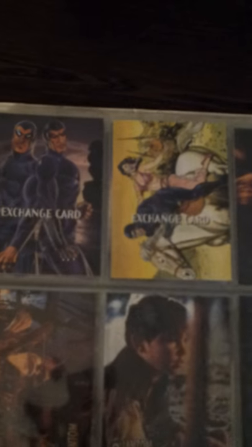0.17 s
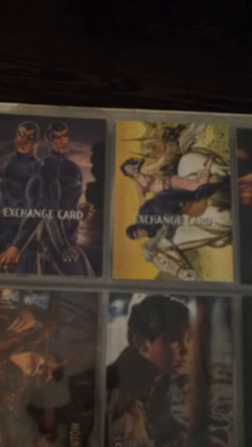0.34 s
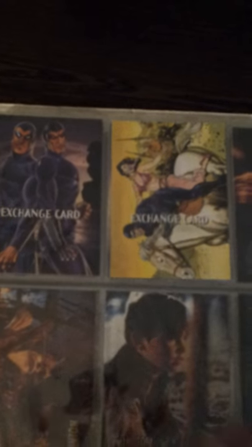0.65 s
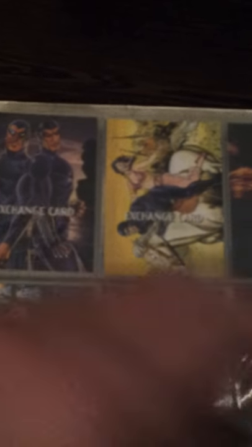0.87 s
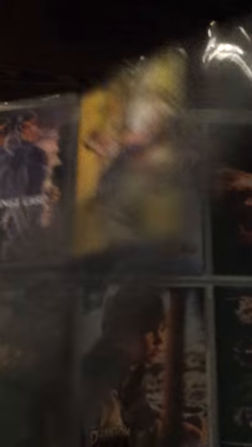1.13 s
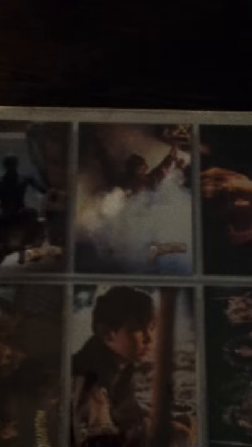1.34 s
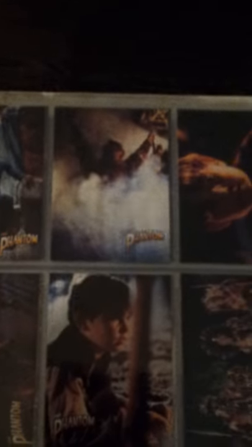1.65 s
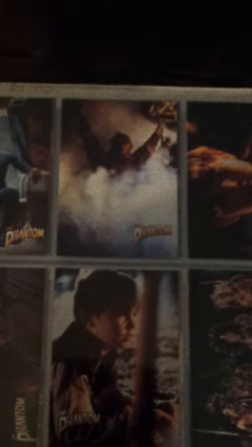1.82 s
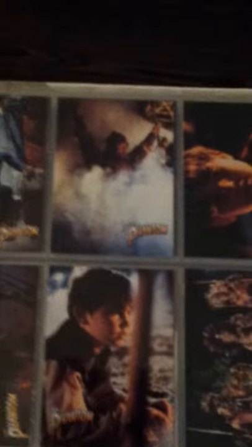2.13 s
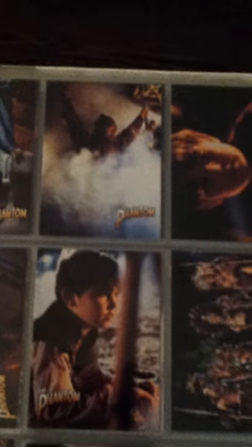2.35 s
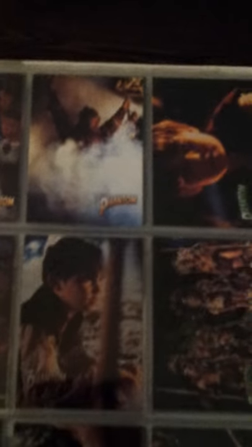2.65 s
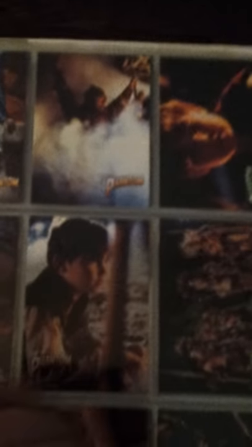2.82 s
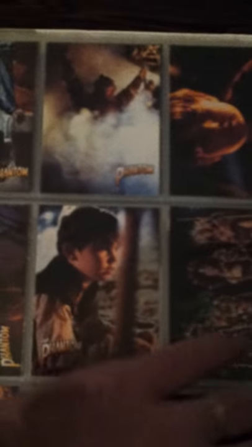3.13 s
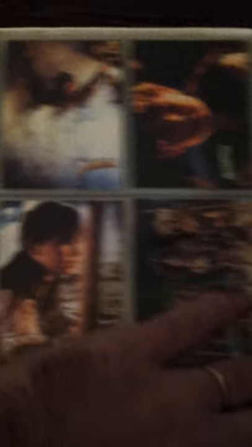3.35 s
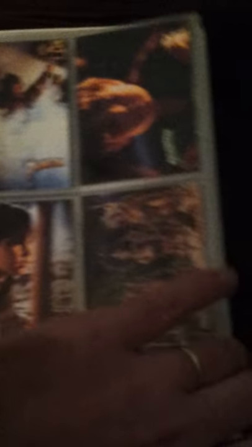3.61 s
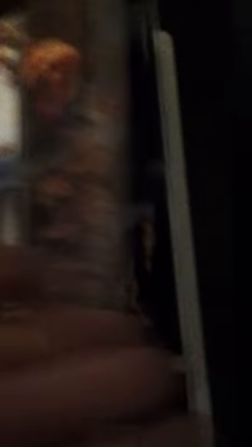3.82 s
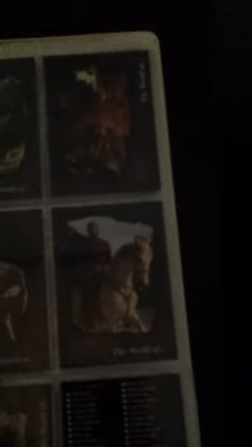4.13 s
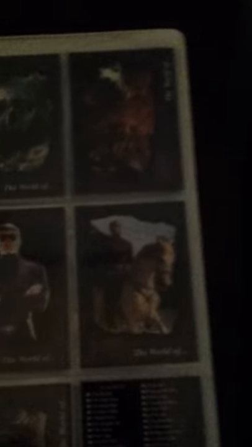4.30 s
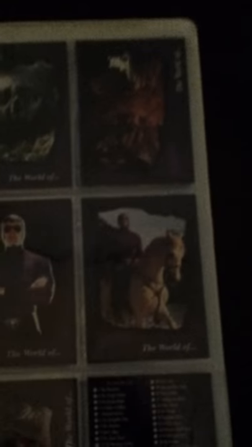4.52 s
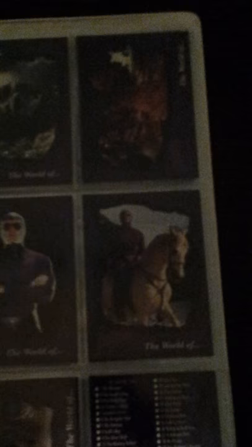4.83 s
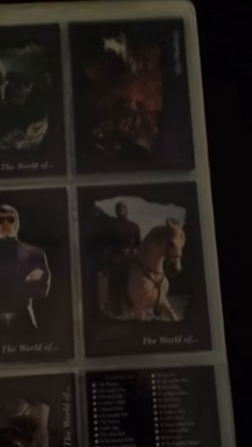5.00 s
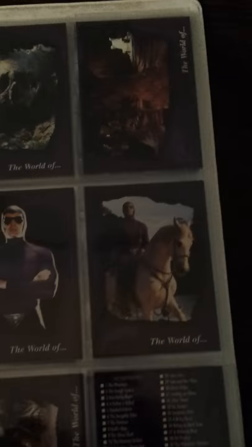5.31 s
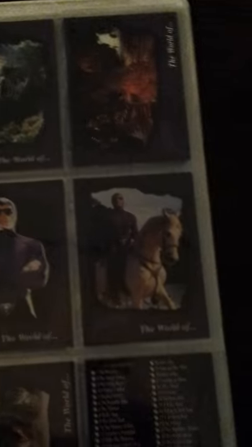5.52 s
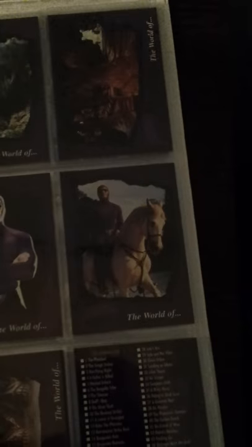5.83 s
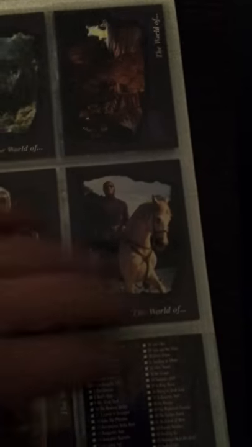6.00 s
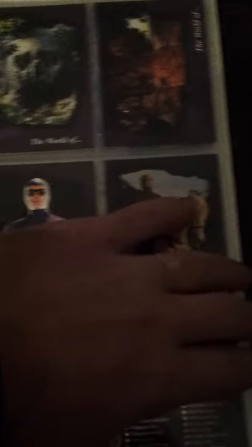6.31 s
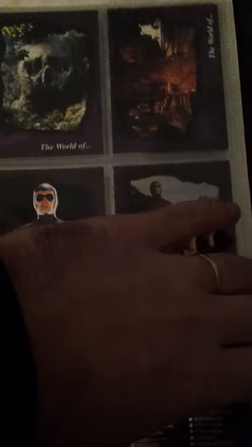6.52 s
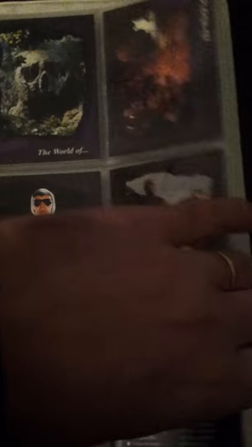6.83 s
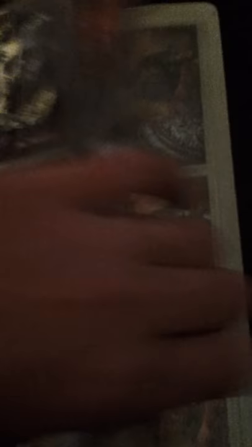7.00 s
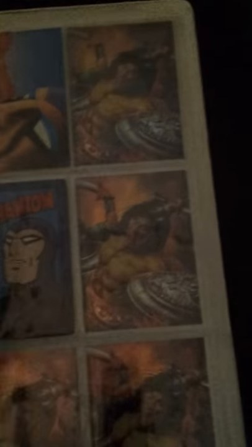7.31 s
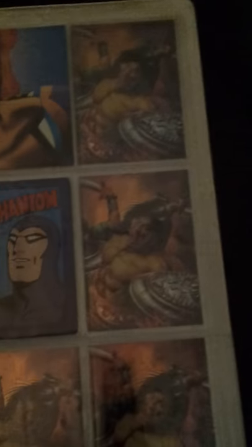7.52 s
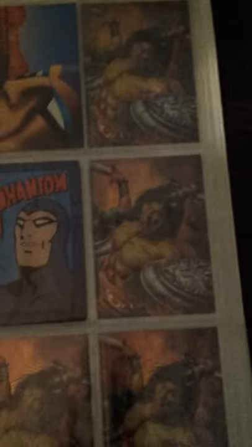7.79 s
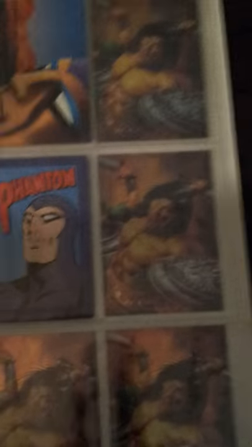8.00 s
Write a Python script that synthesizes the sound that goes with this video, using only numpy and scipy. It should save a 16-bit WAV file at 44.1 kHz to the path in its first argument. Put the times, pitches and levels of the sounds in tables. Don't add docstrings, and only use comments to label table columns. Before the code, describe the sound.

In a quiet small room, a hand turns three stiff plastic pocket pages in a binder. Each turn starts with faint grainy rubbing, grows into crisp snaps and airy pops, then lands with low dull thuds. The second turn is the densest and loudest. A small close microphone adds steady hiss, with only faint reflections.

```python
import sys
import numpy as np
from scipy import signal
from scipy.fft import rfft, irfft, next_fast_len
from scipy.io import wavfile
from scipy.ndimage import uniform_filter1d

SR = 44100
rng = np.random.default_rng(int(sys.argv[2]) if len(sys.argv) > 2 else 0)


def volts_from_decibels(level):
    exponent = np.asarray(level, float) / 20
    return 10 ** exponent


def wav_record(signal):
    frames = np.transpose(np.atleast_2d(signal))
    bounded = np.clip(frames, -1, 1)
    quanta = np.round(bounded * 32767).astype(np.int16)
    wavfile.write(sys.argv[1], SR, quanta)


N = 359415

# (t/s, peak level/dB, f/Hz, t60/s)
THUDS = [(1.1493, -42, 352, 0.081), (1.4974, -35, 92.0, 0.052), (1.5304, -33, 112, 0.25),
         (1.5527, -33.5, 75.0, 0.1), (1.7549, -25.5, 65.0, 0.033), (1.9451, -26.5, 274, 0.026),
         (2.1258, -27.5, 139, 0.045), (2.244, -40.5, 95, .1), (2.345, -30.5, 139, 0.17),
         (3.1631, -46, 147, 0.15), (3.3, -47.5, 149, .1), (3.476, -44.5, 136, 0.09),
         (4.028, -42, 81, 0.055), (4.8585, -31.5, 83.5, 0.12), (5.0007, -38.5, 159, 0.21),
         (5.185, -33, 167, 0.077), (5.2392, -32.5, 166, 0.38), (5.316, -24, 86.0, 0.037),
         (5.5445, -36, 154, 0.2), (5.67, -25.5, 90, 0.068), (5.7129, -37, 146, 0.14),
         (6.566, -45.5, 145, 0.59), (6.615, -43, 157, 0.21), (6.76, -56, 145, 0.21),
         (7.346, -39, 180, 0.045), (7.5128, -35.5, 54.0, 0.093), (7.6858, -41.5, 140, 0.14),
         (7.8928, -32.5, 92.5, 0.13), (7.9407, -34, 86.0, 0.069), (8.121, -38, 94, 0.3)]
# (t/s, peak level/dB, pocket f/Hz, length/ms)
POCKET_POPS = [(.903, -40, 536, 16), (1.1521, -31.5, 640, 5.3), (1.404, -33, 580, 0.98),
               (1.475, -34, 1700, 2.2), (1.535, -36, 900, 2.5), (1.561, -39, 1000, 2),
               (1.7605, -29, 1400, 6.8), (1.948, -26.5, 880, 9.3), (1.9702, -26.5, 1940, 5.9),
               (2.035, -29.5, 1320, 6.1), (2.1288, -30.5, 1260, 1.8), (2.2008, -25, 1730, 3.7),
               (2.2082, -22, 1830, 3.1), (2.2422, -20.5, 825, 3.1), (2.3228, -22, 1200, 6),
               (2.358, -26, 1480, 11),
               (3.312, -42, 704, 2), (3.4692, -39, 1290, 5.2), (3.7302, -39.5, 2080, 5.5),
               (3.9033, -31.5, 1340, 16), (3.853, -45, 1330, 7.4), (4.029, -39, 1540, 5.2),
               (4.199, -26, 2400, 1.6), (4.204, -25, 2100, 1.6), (4.2085, -24, 2000, 1.2),
               (4.2128, -39, 2020, 3.5), (4.2821, -30, 610, 16), (4.4582, -30, 800, 5.6),
               (4.4793, -20.5, 820, 1.5), (4.8603, -22.5, 1600, 3.6), (4.892, -33, 1300, 2.7),
               (4.926, -36.5, 1410, 5.3), (4.9916, -22.5, 676, 10.5), (5.0978, -27, 1630, 11),
               (5.1839, -14, 1360, 8.6), (5.2373, -8, 1570, 2), (5.2728, -13, 1540, 5.2),
               (5.3123, -1.5, 1350, 2.35), (5.326, -18, 1030, 1.14), (5.543, -26.5, 1210, 1.5),
               (5.572, -31, 1290, 3.8), (5.597, -32, 1400, 3.4), (5.6474, -23.5, 1840, 3.1),
               (5.6738, -22, 1320, 1.6),
               (6.318, -41, 2300, 1.9), (6.582, -39, 2520, 7.3), (6.6184, -36.5, 1500, 2.6),
              (7.298, -39, 955, 4.8), (7.5788, -30, 1550, 1.7), (7.583, -25, 1590, 4.7),
              (7.683, -24, 1780, 1.9), (7.6868, -16.5, 1720, 5), (7.7708, -21, 1530, 3),
              (7.845, -28.5, 990, 11.6), (7.889, -24.5, 1610, 14), (7.898, -22.5, 850, 5.4),
              (7.942, -27.5, 1420, 9.1), (8.1165, -22.5, 1850, 6.8)]
POPS = POCKET_POPS


def rms_one(x):
    return x / np.sqrt(np.mean(x ** 2) + 1e-20)


def drift(rate_hz):
    r = np.exp(-2 * np.pi * rate_hz / SR)
    wander = signal.lfilter([1], [1, -2 * r, r * r], rng.standard_normal(N + SR))
    return rms_one(wander[SR:])


def resonance(x, hz, width_hz):
    r = np.exp(-np.pi * width_hz / SR)
    zeros = np.array([1, 0, -1]) * (1 - r * r) / 2
    return signal.lfilter(zeros, [1, -2 * r * np.cos(2 * np.pi * hz / SR), r * r], x)


def body(x, modes, patchy_db, tilt_db=0):
    out = 0
    for k, (hz, width_hz, db) in enumerate(modes):
        lean_db = tilt_db * np.log2(hz / 6500)
        ring = resonance(resonance(x, hz, width_hz), hz, 4.62 * width_hz)
        out = out + (-1) ** k * volts_from_decibels(db + lean_db + patchy_db * drift(4.9)) * ring
    return rms_one(out)


def in_time(rows):
    s, *columns = np.transpose(rows)
    return [np.interp(np.arange(N) / SR, s, c) for c in columns]


def place(out, s, peak_db, sound):
    at = round(s * SR)
    scaled = volts_from_decibels(peak_db) * sound / np.abs(sound).max()
    return np.pad(scaled, (at, N))[:N] + out


def hiss():
    # (f/Hz, level/dB per Hz)
    colour = [(20, -21), (42, 0), (100, -11), (300, -9.5), (2600, -20), (11500, -21.5), (15000, -16),
              (22000, -120)]
    hz, db = np.transpose(colour)
    grid = np.arange(N // 2 + 1) * SR / N + 1
    shape = volts_from_decibels(np.interp(np.log(grid), np.log(hz), db))
    return volts_from_decibels(-59) * rms_one(irfft(rfft(rng.standard_normal(N)) * shape, N))


def room(x):
    t60_s, wall_cut_hz = 0.44, 1540
    size = next_fast_len(N + SR)
    turn = np.exp(-2j * np.pi * np.arange(size // 2 + 1) / size)
    dull = np.exp(-2 * np.pi * wall_cut_hz / SR)
    echo = 0
    for k, lag in enumerate((rng.uniform(.006, 0.028, 8) * SR).astype(int)):
        loop = volts_from_decibels(-60 * lag / SR / t60_s) * (1 - dull) / (1 - dull * turn) * turn ** lag
        echo = echo + (-1) ** k * loop / (1 - loop)
    return irfft(rfft(x, size) * echo, size)[:N]


def squeak():
    length_s, start_hz, tight_hz, tighten_s = .125, 6500, 8400, .065
    t = np.arange(round(length_s * SR)) / SR
    hz = tight_hz - (tight_hz - start_hz) * np.exp(-t / tighten_s)
    waver = volts_from_decibels(2.1 * drift(60)[:len(t)])
    swelling = np.sin(np.pi * t / length_s) ** .5
    whistle = np.sin(2 * np.pi * np.cumsum(hz) / SR)
    return place(0, 4.068, -50, swelling * waver * whistle)


def thuds():
    out, t = 0, np.arange(12000) / SR
    for s, peak_db, hz, t60 in THUDS:
        fade = volts_from_decibels(-60 * t / max(0.49 * t60, .02)) * (1 - np.exp(-t / 0.0026))
        overtone = .5 * np.sin(2 * np.pi * 1.65 * hz * t) * np.exp(-t / 0.0048)
        swing = -np.sin(2 * np.pi * hz * t) - overtone
        puff = rms_one(resonance(rng.standard_normal(len(t)), 358, 340))
        out = place(out, s + 0.00088, peak_db + 0.37, fade * (swing + 0.5 * puff))
    return signal.sosfilt(signal.butter(2, 46.3, "high", fs=SR, output="sos"), out)


def pops():
    out, size = 0, 2048
    ms = np.arange(size) / SR * 1000
    for s, peak_db, pocket_hz, length_ms in POPS:
        noise, settle = rng.standard_normal((2, size))
        length = np.clip(length_ms, .5, 12)
        kick = noise * ms / length * np.exp(-(ms / (.5 * length)) ** 2)
        kick += volts_from_decibels(-16.5) * settle * np.exp(-ms / 4.04)
        pocket = resonance(resonance(kick, pocket_hz, 270), pocket_hz, 1100)
        knock = resonance(resonance(kick, 790, 246.0), 2020, 990)
        breath = 0.29 * resonance(kick, 1.02 * pocket_hz, 1800)
        out = place(out, s - .0003, peak_db - .3, pocket + volts_from_decibels(-3.0) * knock + breath)
    return out


def all_snaps():
    # (t/s, peak level/dB, crack f/Hz, crumble/ms)
    first = [(0.937, -30, 7260, 0.91), (1.0874, -27, 5440, 0.14), (1.297, -43, 5980, 1.9),
             (1.4633, -21, 5560, 1.3), (1.7621, -21.5, 5260, 0.42), (1.9492, -4.5, 6900, 0.45),
             (1.949, -12.5, 6700.0, 1.8), (1.972, -17, 4730, 0.58), (2.0352, -35, 5260, 0.2),
             (2.1333, -27.5, 5600, 1.1), (2.201, -36, 6050, 0.59), (2.2078, -11, 6300, 0.72),
             (2.2439, -12, 6500, 0.17),]
    # (t/s, peak level/dB, crack f/Hz, crumble/ms)
    lift = [
        (3.164, -37.5, 6600, 0.65),
        (3.74, -29.5, 5540, 2.3),
        (3.789, -25.5, 5930, 0.34),
        (3.9088, -21.5, 3000, 0.29),
        (3.9113, -21, 4100, 0.17),
    ]
    # (t/s, peak level/dB, crack f/Hz)
    peel = [(4.0311, -37, 3100), (4.0343, -33, 6700), (4.0562, -25, 6300), (4.0616, -29, 5900),
            (4.0632, -30, 6400), (4.097, -34, 6700), (4.1257, -25.5, 5400), (4.1286, -30, 5700),
            (4.1432, -31, 6300), (4.1592, -21, 6700), (4.1622, -34, 6700), (4.178, -29, 6300),
            (4.2, -17, 6300), (4.2043, -24, 6500), (4.2085, -22, 3660), (4.2125, -16, 6100),
            (4.2198, -18, 6100), (4.2429, -29, 6800), (4.2452, -33, 6500), (4.2681, -32, 6700),
            (4.2704, -34, 6400), (4.285, -14, 5860), (4.2888, -21, 6030), (4.299, -28, 6400),
            (4.3294, -13, 6500), (4.3334, -11, 8100), (4.336, -14.5, 8950), (4.338, -23, 5800),
            (4.35, -18, 7500), (4.3522, -18, 6600), (4.361, -23, 6600), (4.3777, -12, 7060),
            (4.381, -8, 7150), (4.384, -24, 6400), (4.3962, -20, 6300), (4.4004, -26, 5700),
            (4.4137, -27, 6500), (4.4212, -24, 7300), (4.4358, -29, 6500), (4.439, -17, 6100),
            (4.4468, -17, 6360), (4.451, -19, 6800), (4.46, -21, 6700), (4.4652, -15, 6040),
            (4.479, -25, 6800), (4.479, -13, 6200), (4.49, -13, 6360), (4.4939, -10, 6360),
            (4.4987, -21, 6600), (4.5168, -26, 6430), (4.5195, -16, 7100), (4.522, -13, 7060),
            (4.527, -22, 6000), (4.529, -20, 5000), (4.532, -19, 8060), (4.542, -26, 6500),
            (4.5801, -26, 6350), (4.5837, -52, 6700)]
    # (t/s, peak level/dB, crack f/Hz, crumble/ms)
    flip = [(4.9943, -24, 6030, 0.67), (5.099, -20.5, 5330, 0.14), (5.1828, -11, 8100, 2.8),
            (5.1862, -14, 5700, 5.6), (5.2364, -1.5, 6140, 0.81), (5.238, -4.5, 7160, 1),
            (5.273, -13, 7300, 1.8), (5.277, -15, 5060, 1.5), (5.311, -0.5, 5900, 0.76),
            (5.313, -7.5, 4800, 0.64), (5.314, -1.5, 4500, 0.38), (5.451, -25.5, 6060, 0.17),
            (5.648, -18, 6500, 0.62), (5.6517, -13.5, 6300, 0.27), (5.674, -21, 9500, 0.89)]
    # (t/s, peak level/dB, crack f/Hz, crumble/ms)
    third = [(6.3194, -34, 4120, 0.48), (6.6368, -28, 7100, 0.08), (6.819, -24, 6640, 0.92),
             (7.002, -30, 6300, 0.71), (7.0636, -16.5, 4330, 2.3), (7.0924, -18.5, 6570, 1.1),
             (7.2148, -26, 6700, 1.6), (7.3012, -26.5, 8350.0, 0.36), (7.3282, -17.5, 5130, 0.3),
             (7.3322, -19, 6900, 0.17), (7.6826, -18, 6350, 0.65), (7.6867, -13, 6000, 0.5),
             (7.7703, -15, 6200, 0.99), (7.8876, -14, 6500, 0.19), (7.898, -18.5, 5900, 0.78),
             (7.9225, -21.5, 6140, 0.32), (8.12, -25, 3280, 0.88)]
    # (t/s, peak level/dB, crack f/Hz)
    further_cracks = [(0.6498, -47, 5900), (1.2914, -46, 6700), (1.2992, -35, 3870), (1.7273, -26, 5800),
                      (1.9472, -28, 5300), (1.9523, -28, 6200), (1.975, -38, 4800), (2.2108, -44, 4300),
                      (2.2237, -31, 5200), (2.3232, -38, 4100), (2.36, -43, 4300), (2.3646, -28, 3500),
                      (2.365, -27, 3000), (2.395, -34, 5040), (2.4482, -38, 5800), (3.1567, -43, 6200),
                      (3.2896, -39, 5400), (3.3141, -46, 5600), (3.6076, -41, 5300), (3.619, -43, 7600),
                      (3.7116, -44, 6900), (3.7918, -47, 5200), (4.8931, -26, 5200), (4.9968, -29.5, 3420),
                      (5.0053, -37, 6700), (5.105, -19, 7100), (5.24, -8, 4900), (5.3425, -19, 6900),
                      (5.3891, -27, 5370), (5.413, -26.5, 7100), (5.4298, -33, 8000), (5.4672, -31, 6000),
                      (5.741, -39, 6000), (6.2763, -50, 6400), (6.3673, -47, 5900), (6.5608, -43, 5600),
                      (6.5741, -40, 6600), (6.6044, -29, 7050), (6.6177, -41, 6400), (6.8207, -42, 6600),
                      (6.879, -42, 7400), (6.9357, -45, 6700), (7.0104, -31, 3860), (7.044, -49, 6900),
                      (7.0663, -32, 4700), (7.0756, -28, 8640), (7.0792, -41, 7800), (7.2117, -30, 7400),
                      (7.5842, -52, 3400), (7.5938, -44.5, 6300), (7.6266, -43, 5300), (7.6904, -28, 3600),
                      (7.7732, -29, 6900), (7.7938, -27.5, 4100), (7.8181, -25.5, 7200), (7.8502, -32, 6200),
                      (7.8692, -31, 6700), (8.1252, -24.5, 6200)]
    peel_crumble_ms, tick_crumble_ms = 0.44, 0.72
    peel = [tuple(row) + (peel_crumble_ms,) for row in peel]
    further_cracks = [tuple(row) + (tick_crumble_ms,) for row in further_cracks]
    return first + lift + peel + flip + third + further_cracks


def snaps():
    out, size = 0, 2048
    ms = np.arange(size) / SR * 1000
    for s, peak_db, crack_hz, crumble_ms in all_snaps():
        noise, settle = rng.standard_normal((2, size))
        length = np.clip(crumble_ms, .08, 6)
        cracks = 0.77 * np.minimum(length, 1.6) * noise * np.exp(-(ms / (0.65 * length)) ** 2)
        cracks += volts_from_decibels(-22.0) * settle * np.exp(-ms / 3.0)
        cracks[0] = 0.85
        crack = resonance(resonance(cracks, crack_hz, 1290), crack_hz, 4400)
        sleeve = 0.095 * resonance(cracks, 4600, 450)
        sleeve += volts_from_decibels(-8 + 0.21 * peak_db) * resonance(cracks, 3400, 8000)
        sleeve += volts_from_decibels(-12.5 + .3 * peak_db) * resonance(cracks, 12100, 1700)
        out = place(out, s - .0002, peak_db - .3, crack + sleeve)
    return out


def swell(peak_s, peak_db, rise_s, fall_s):
    t = np.arange(N // 32 + 1) * 32 / SR - peak_s
    below = np.where(t < 0, -t / max(rise_s, .001), t / max(fall_s, .01))
    return volts_from_decibels(peak_db - 20 * below) ** 2


def handling():
    # (loudest t/s, friction level/dB, rise/s, fall/s, sheet over
    # friction/dB)
    hand_strokes = [(.435, -60.5, 0.044, 0.056, 8), (.5, -66, .6, .5, 10), (.82, -55.5, 0.3, 0.058, 4.5),
                    (.94, -49.5, 0.19, 0.022, 2), (1.05, -50, 0.13, 0.16, 2), (1.2, -54, .3, .4, 3.5),
                    (1.377, -43, 0.17, 0.23, -3.5), (1.473, -35, 0.057, 0.071, -7),
                    (1.5, -36.5, .06, 0.016, -6), (1.628, -44.5, 0.24, 0.096, 0),
                    (1.748, -40, 0.41, 0.032, -2.5), (1.832, -50.5, .065, 0.17, -1.5),
                    (2.325, -40.5, 0.12, 0.094, 3.5),
                    (3.137, -63.5, .8, .1, -5), (3.173, -53, 0.046, 0.058, -10),
                      (3.293, -56, 0.11, 0.082, -21), (3.472, -61, 0.062, 0.42, -20),
                      (3.736, -40, 0.027, 0.03, -7), (3.915, -58, 0.2, 0.05, 2),
                      (4.13, -56, 0.08, 0.065, -13), (4.177, -33.5, 0.0076, 0.16, -8),
                      (4.216, -38, 0.03, 0.068, -17), (4.4, -49.5, 1, 0.31, 3),
                      (4.466, -26.5, .02, 0.039, -24), (4.493, -36, 0.11, 0.021, -2),
                      (4.521, -39, 0.022, 0.026, -9), (4.7, -57, 0.2, 0.38, 8.5),
                      (4.81, -40.5, 0.18, 0.14, 0.5), (4.863, -36, 0.095, 0.055, -3.5),
                      (5.047, -44, 0.017, .06, -5), (5.1, -42, 0.07, 0.06, 2.5), (5.49, -50, 0.11, .1, -15),
                      (5.545, -39, 0.064, 0.046, -3.5), (5.6, -34, 0.071, 0.13, -8.5),
                      (5.649, -32.5, 0.037, 0.038, -17),
                    (6.325, -54, 0.14, 0.11, 1.5), (6.561, -58.5, 0.092, 0.084, 8.5),
                     (6.597, -42.5, 0.04, .026, -7), (6.772, -59, 0.033, 0.034, 6.5),
                     (7.004, -53, 0.13, 0.063, 1.5), (7.078, -45, 0.027, .01, 1),
                     (7.136, -49, 0.07, 0.23, 0), (7.306, -38.5, 0.036, 0.28, 0),
                     (7.338, -34.5, 0.034, 0.025, 1), (7.439, -46, 0.17, 0.21, -0.5),
                     (7.5, -39, .015, 0.076, -4), (7.548, -39.5, 0.33, 0.029, -5.5),
                     (7.782, -44.5, 0.028, 0.17, 6), (7.902, -49, 0.25, 0.16, 6.5)]
    strokes = hand_strokes
    resting_db = (-76.5, -93.5, -67)
    film_after_db, sheet_after_db, rumble_after_db = -36, -30.5, -13.5
    film_settle_s, sheet_settle_s, rumble_settle_s = 0.14, 0.15, 0.082
    lead_s = 0.006

    film = sum(swell(s, db, rise, fall) for s, db, rise, fall, _ in strokes)
    sheet = sum(swell(s, db + over_db, rise, fall) for s, db, rise, fall, over_db in strokes)
    film = film + sum(swell(s, db + film_after_db, lead_s, film_settle_s) for s, db, *_ in all_snaps())
    sheet = sheet + sum(swell(s, db + sheet_after_db, lead_s, sheet_settle_s) for s, db, *_ in POPS)
    lag = np.exp(-32 / SR / 0.012)
    rumble = volts_from_decibels(-15) ** 2 * signal.lfilter([1 - lag], [1, -lag], sheet)
    rumble = rumble + sum(swell(s, db + rumble_after_db, 0.017, rumble_settle_s) for s, db, *_ in THUDS)
    levels = []
    for power, rest_db in zip((film, sheet, rumble), resting_db):
        level_db = 10 * np.log10(power + volts_from_decibels(rest_db) ** 2)
        levels.append(np.interp(np.arange(N) / 32, np.arange(len(power)), level_db))
    return levels


def grains(per_s, crinkle_db):
    born = rng.random(N) < per_s / SR
    sizes = volts_from_decibels(crinkle_db * (np.minimum(rng.exponential(1, N), 5) + 2.1 * drift(71)))
    clicks = born * sizes * rng.choice([-1, 1], N)
    return clicks / np.sqrt(uniform_filter1d(clicks ** 2, size=3000) + 1e-12)


def wedge(x, hz, width_hz):
    out, state = np.zeros(N), np.zeros(2)
    r = np.exp(-np.pi * width_hz / SR)
    for i in range(0, N, 256):
        poles = [1, -2 * r * np.cos(2 * np.pi * hz[i] / SR), r * r]
        out[i:i + 256], state = signal.lfilter([1, 0, -1], poles, x[i:i + 256], zi=state)
    return rms_one(out)


def sliding():
    # (f/Hz, width/Hz, level/dB)
    film_modes = [(2600, 1330, 2.5), (4500, 1200, -0.5), (6300, 1800, 6.5), (7600, 2700, 3),
                  (9630, 3250, -1.5)]
    # (f/Hz, width/Hz, level/dB)
    sheet_modes = [(508, 650, 0.5), (850, 770, 4), (1510, 490, -2.5), (2300, 550, -2)]
    # (f/Hz, width/Hz, level/dB)
    rumble_modes = [(59.6, 73, 1), (100.7, 51, 2.5), (152, 32.4, -0.5), (240, 420, -13.5)]
    # (t/s, air wedge f/Hz, wedge level over the sheet/dB, crinkle/dB,
    # film brightness/dB per octave)
    grip = [(.8, 1900, -5.5, 0.6, -4), (1.3, 1720, -7, 0.95, 0), (1.45, 1750, 0, 0.2, 0.5),
            (1.75, 1690, -1, 1.3, -0.5), (2.3, 1260, 0, 0.5, -0.5), (3.9, 1340, -6.5, 2.5, 1),
            (4.15, 2300, -1.5, 0.5, -0.5), (4.25, 2240, -2, 1.5, -1), (4.275, 850, 3, -1.5, 0.5),
            (4.53, 734, 4, 4, -2), (4.6, 1790, -2.5, 0, 1.5), (4.88, 1640, -1.5, .5, 1),
            (5.3, 1300, 4, 1.5, -0.5), (5.6, 1390, 3.5, 1, 5.5), (6.6, 2520, -4.5, 1.1, 1),
            (7.3, 850, -3, 1.5, 1.5), (7.39, 1750, -1.5, 0.5, 1), (7.9, 1370, -5.5, -0.5, -0.5)]
    bright_db, sheet_db, rumble_db = handling()
    wedge_hz, wedge_db, crinkle_db, tilt_db = in_time(grip)
    rub = grains(7000.0, np.clip(crinkle_db, 0, 5))
    soft = signal.sosfilt(signal.butter(2, 10500, fs=SR, output="sos"), rub)
    film = volts_from_decibels(bright_db) * body(soft, film_modes, 1.0, tilt_db)
    mixed = rub + rng.standard_normal(N)
    sheet = body(mixed, sheet_modes, 1.05) + volts_from_decibels(wedge_db) * wedge(mixed, wedge_hz, 260)
    rumble = volts_from_decibels(rumble_db) * body(rng.standard_normal(N), rumble_modes, 3.4)
    return film + volts_from_decibels(sheet_db - 6.0 + 3.0 * drift(37.4)) * sheet + rumble


def scene():
    binder = sliding() + snaps() + pops() + thuds() + squeak()
    return (binder + volts_from_decibels(-20) * room(binder) + hiss())[None]


def band_limit(x):
    return signal.sosfilt(signal.butter(12, 12710, fs=SR, output="sos"), x)


def record(dry):
    cutoff_hz, top_hz, peak = 12300, 16300, .9
    cut = signal.sosfilt(signal.cheby2(20, 70, cutoff_hz, fs=SR, output="sos"), dry)
    held = peak * np.tanh(cut / peak)
    mix = signal.sosfilt(signal.cheby2(20, 80, top_hz, fs=SR, output="sos"), held)
    return band_limit(mix)


dry = scene()
out = record(dry)
wav_record(out)
```